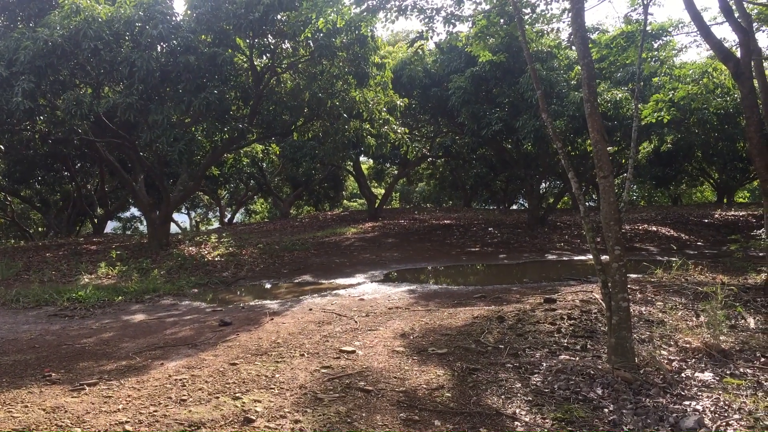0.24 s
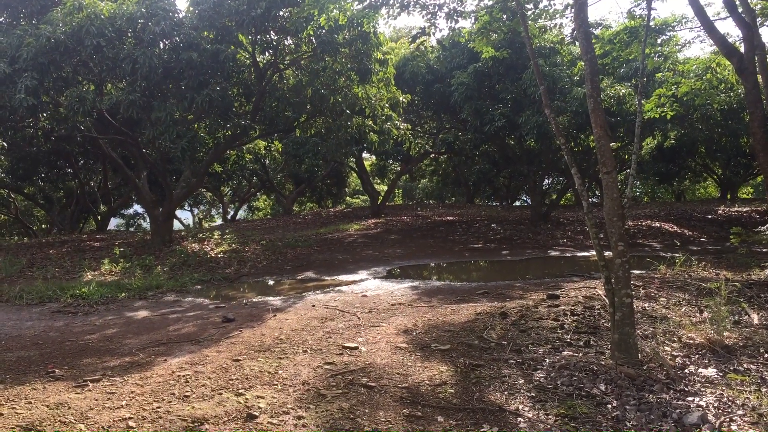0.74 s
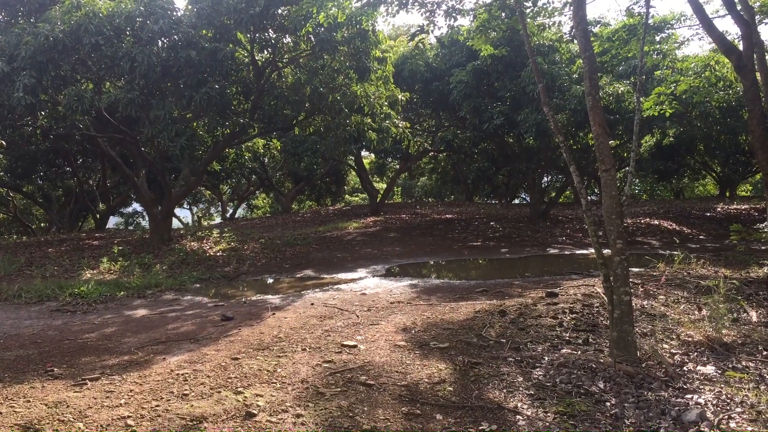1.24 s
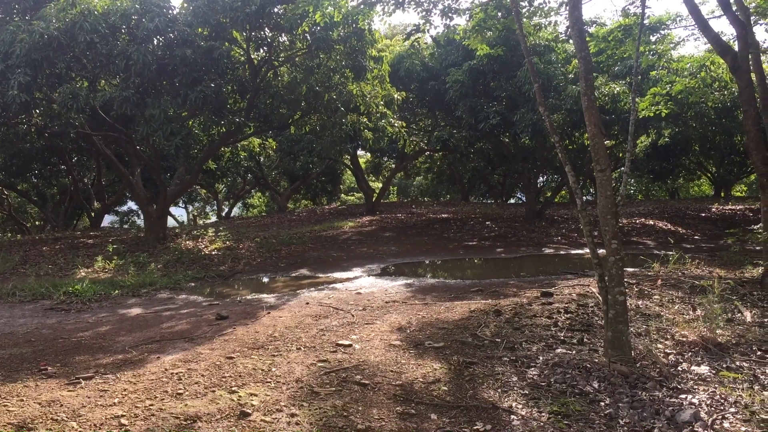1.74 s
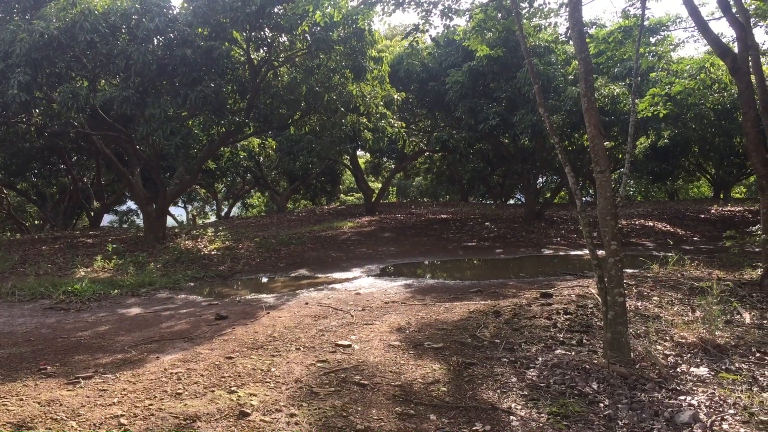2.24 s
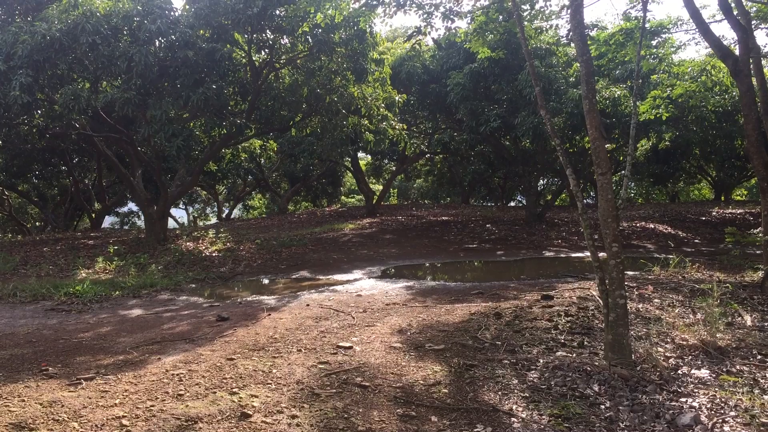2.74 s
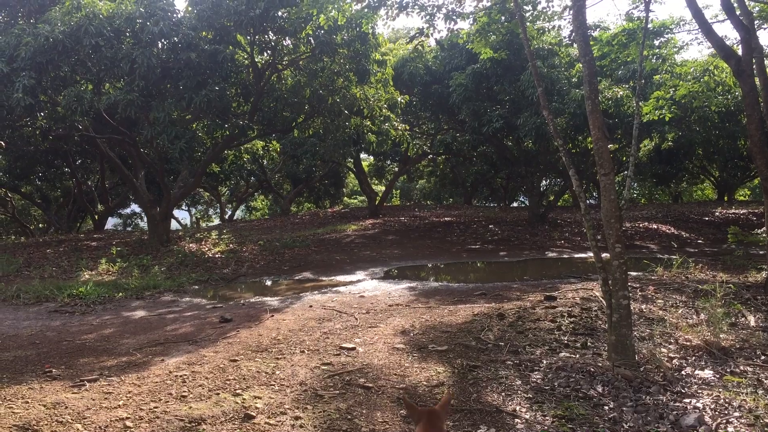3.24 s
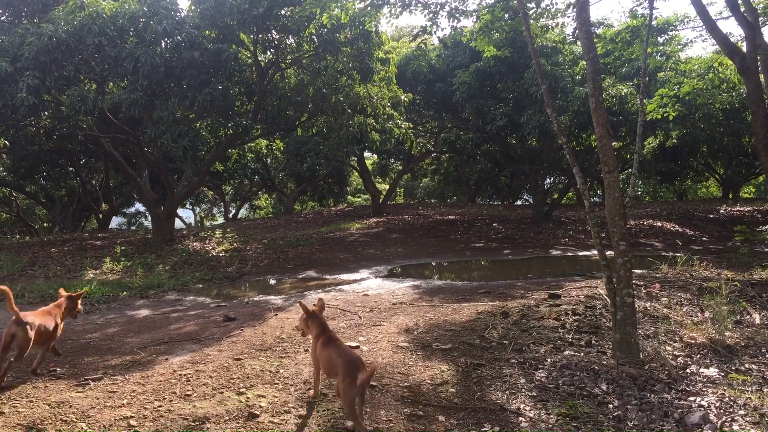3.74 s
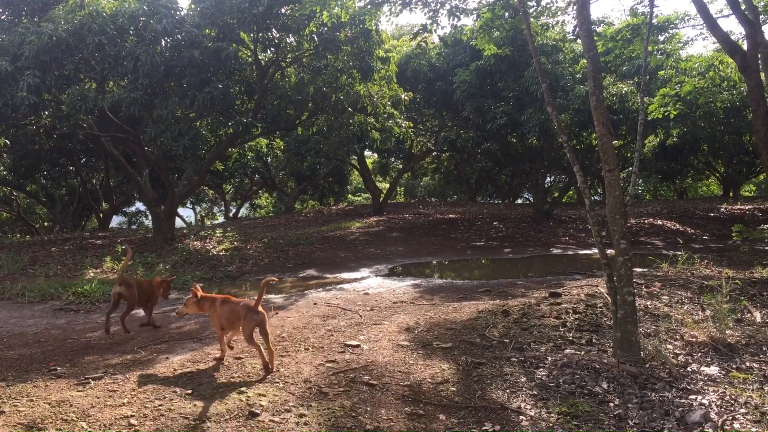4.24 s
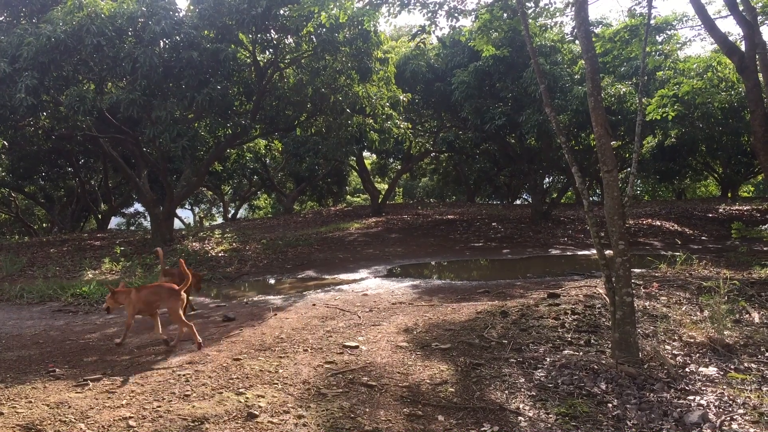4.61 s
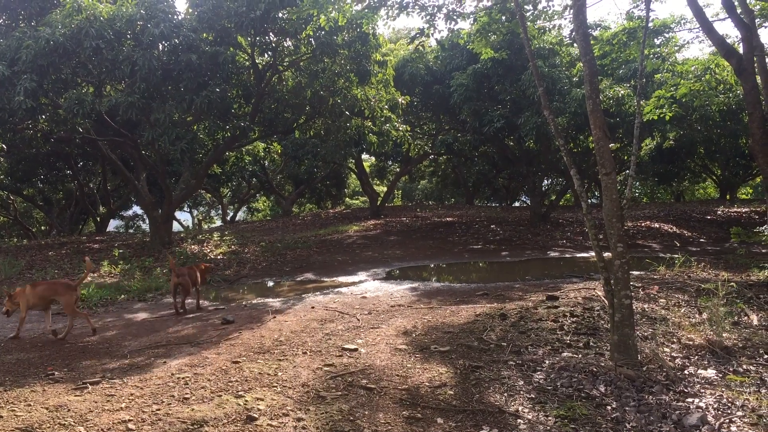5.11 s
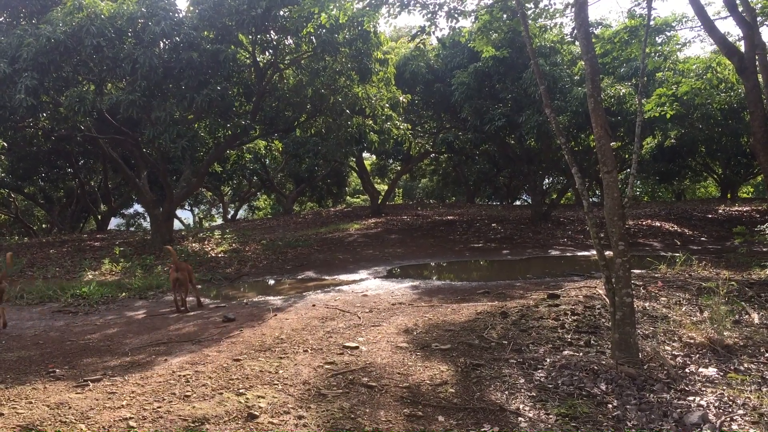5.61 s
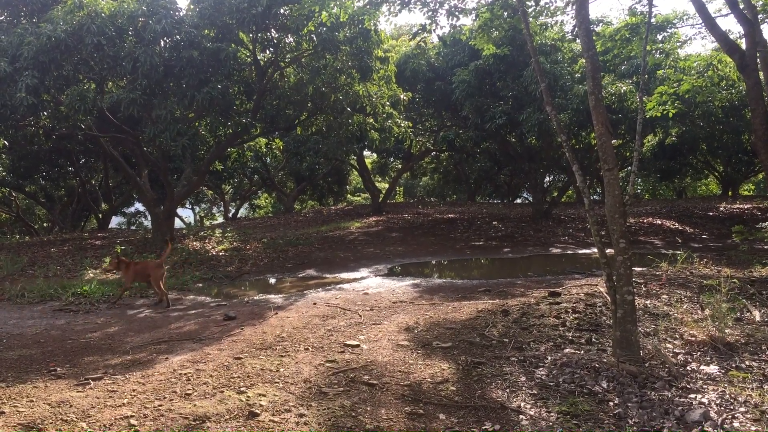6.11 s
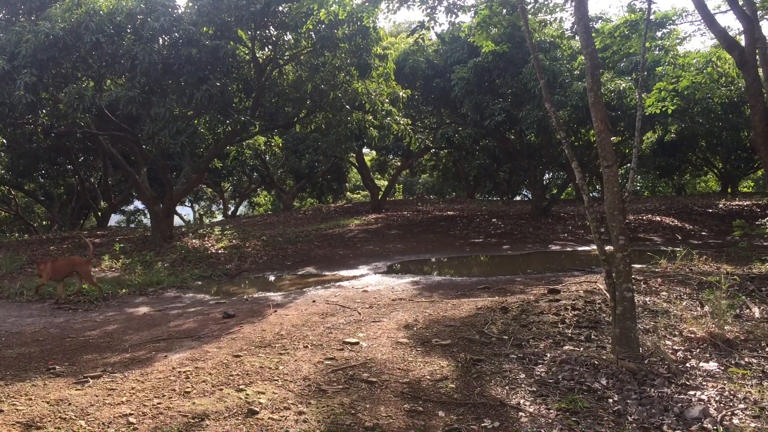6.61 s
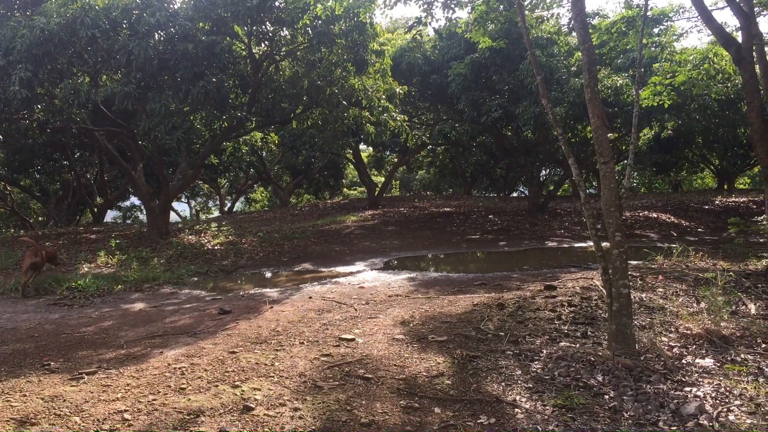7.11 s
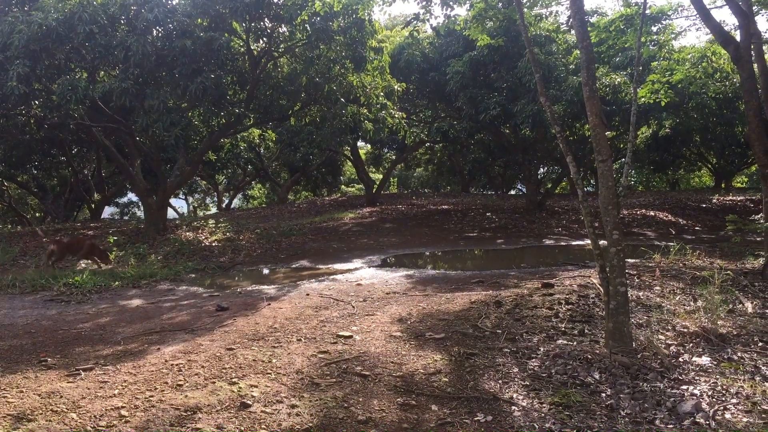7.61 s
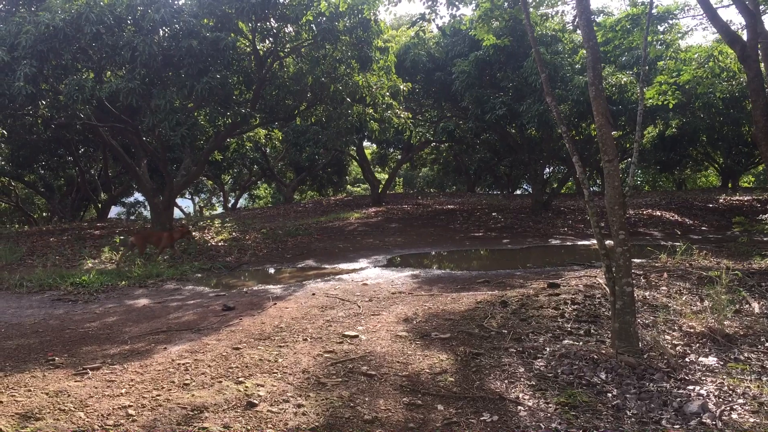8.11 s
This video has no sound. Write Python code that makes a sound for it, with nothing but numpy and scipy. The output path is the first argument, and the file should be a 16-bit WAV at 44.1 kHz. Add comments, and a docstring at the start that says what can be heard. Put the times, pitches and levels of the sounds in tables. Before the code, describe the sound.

A dense, shrill cicada chorus pulses steadily in a sunny orchard while wind bumps the microphone, dog paws scuff soil and a far dove coos.

```python
"""A cicada chorus in a sunny orchard, heard by one microphone, over a faint rustle of the grove.
From the start several kinds of singers, trains of clicks and hiss, hold their own bands; a near one buzzes in
phrases with short pauses. Light wind buffets the microphone as lumps of low noise. From about 2 s two dogs
trot past, scuffing the soil with ringing bursts of grit; after 3 s a far dove coos twice in near-sine notes.
Near 5 s and 7 s a small insect chirps faintly in buzzy tones."""
import sys
import numpy as np
from scipy import signal
from scipy.fft import rfft, irfft, next_fast_len
from scipy.io import wavfile
from scipy.ndimage import uniform_filter1d

SR = 44100
rng = np.random.default_rng(int(sys.argv[2]) if len(sys.argv) > 2 else 0)


def to_wav(sig):
    """Store sig (one row per channel, or 1-D mono) as 16-bit WAV at the path in sys.argv[1].

    Samples outside -1..1 are clipped; the rate is SR.
    """
    pcm = np.clip(np.atleast_2d(sig), -1, 1) * 32767
    pcm = np.round(pcm).astype(np.int16)
    wavfile.write(sys.argv[1], SR, pcm.T)  # frames by channels


N = 368235

# Spectrum of the grove's far rustle. Each row: frequency in Hz, relative density in dB per Hz.
RUSTLE_SPECTRUM = [(88, -35), (150, -1), (374, -4), (439, -7), (871, -8), (2080, -8), (2300, -13.5),
                   (2990, -42), (5060, -120)]
RUSTLE_DB = -72

# Spectra of large and small wind eddies. Each row: frequency in Hz, relative density in dB per Hz.
LARGE_EDDY_SPECTRUM = [(20, -6), (35, -4.5), (60, 4.5), (90, -2.5), (120, -10), (170, -29.5)]
SMALL_EDDY_SPECTRUM = [(70, -20), (105, -0.5), (150, -4.5), (206, -11.5), (264, -17.5), (350, -27),
                       (420, -38), (600, -78)]
# Breeze under the knocks. Each row: time in seconds, level in dB ahead of the chance swell and the port.
BREEZE = [(0.0, -42), (0.18, -69), (0.58, -57), (0.91, -64.5), (1.44, -55.5), (2.14, -70), (5.0, -60.5),
          (5.25, -66), (6.05, -63.5), (7.49, -67.5), (7.7, -75.5), (8.35, -66.5)]
BREEZE_SWELL_DB, BREEZE_UPPER_DB = 4.0, -15   # spread of the chance swell; small eddies relative to large
# Single knocks of wind on the microphone. Each row: time of the peak in seconds, peak level in dB ahead of
# the port, level of the upper part relative to that in dB, width at half height in seconds.
KNOCKS = [(0.0, -39.5, 4, 0.065), (0.108, -48.3, -4.5, 0.048), (0.278, -49.5, -8, 0.018),
          (0.365, -46, -6.5, 0.029), (0.481, -35.3, -3, 0.033), (0.602, -40.3, -7, 0.056),
          (0.675, -47.5, -4, 0.024), (0.757, -49.5, -5.5, 0.042), (0.882, -56.5, -7, 0.066),
          (1.084, -60, 5, 0.038), (1.2, -64, 1, 0.039), (1.269, -40.5, -9.5, 0.025),
          (1.42, -37.5, 6, 0.034), (1.475, -40, -8, 0.029), (1.55, -44, -17, 0.028),
          (1.746, -59, 5.5, 0.045), (1.843, -61, -3, 0.042), (1.966, -53.4, 0.5, 0.04),
          (2.053, -55.8, 0, 0.031), (2.338, -56, -0.5, 0.078), (2.54, -62.5, -9, 0.058),
          (2.659, -46, -8.5, 0.045), (2.938, -58, -20, 0.034), (3.076, -55, -21, 0.047),
          (3.191, -47.5, -15, 0.052), (3.269, -56, 7.5, 0.042), (3.468, -59, -14, 0.032),
          (3.541, -53, -29, 0.035), (3.672, -74, -5, 0.027), (3.769, -51, -9, 0.031),
          (3.842, -58, -15, 0.027), (3.947, -54, -30, 0.033), (4.03, -50, -34, 0.073),
          (4.076, -54.5, -5, 0.027), (4.229, -42, -35, 0.013), (4.297, -54.6, -7.5, 0.06),
          (4.53, -62, -21, 0.026), (4.674, -47, -22, 0.025), (4.825, -54.5, -3.5, 0.072),
          (4.918, -49, -6, 0.047), (4.97, -37.7, -9.5, 0.048), (5.033, -46, -21, 0.035),
          (5.198, -56, -26, 0.018), (5.476, -59, -26, 0.032), (5.716, -55.2, -17.9, 0.031),
          (5.783, -43, -5.9, 0.026), (5.985, -37.5, -12.0, 0.029), (6.122, -46, -11, 0.018),
          (6.22, -44.5, -20, 0.032), (6.297, -59.0, -3, 0.035), (6.394, -48.5, -30, 0.026),
          (6.64, -65, -19, 0.033), (6.867, -59, -8, 0.041), (7.088, -55, -17, 0.07),
          (7.166, -46, -18, 0.045), (7.305, -55, -9, 0.035), (7.416, -62, 5.5, 0.047),
          (7.502, -56, 7, 0.039), (8.238, -57.0, -7, 0.032)]
WAKE_S, WAKE_DB = 0.033, -18.5   # decay time of the wake behind a knock, and its level relative to the knock
KNOCK_UPPER_SHARE = 0.73   # the upper part is this share of the knock's width
PORT_CUT_HZ = 346   # the port muffles the wind above this

# Faint chirps of a small insect. Each row: start in seconds, relative level in dB, pitch in Hz,
# length in seconds.
CHIRPS = [(4.924, -72, 3460, 0.04), (5.292, -75, 3745, 0.032), (6.978, -68, 3440, 0.03),
          (7.062, -76, 3660, 0.033)]
CHIRP_GAIN_DB = 16.5   # added to every chirp's relative level

# Paws scuffing soil. Each row: time in seconds, peak level in dB, ring of the hollow in Hz,
# length of the touch in seconds, level of the broad rasp relative to the ring in dB.
SCUFFS = [(2.145, -52, 1080, 0.03, -4), (2.356, -54, 590, 0.032, -6), (2.387, -42.5, 616, 0.031, 4),
          (2.416, -58, 1162, 0.025, 7), (2.7, -44.5, 1010, 0.026, 1), (2.738, -55, 1030, 0.03, 3),
          (2.901, -58.5, 900, 0.028, -7), (2.934, -59, 1490, 0.018, -11), (2.986, -60, 592, 0.017, -4),
          (3.031, -48.5, 1380, 0.018, 5), (3.07, -51.5, 1100, 0.025, -7), (3.264, -43.5, 1360, 0.045, -5),
          (3.688, -48, 1500, 0.044, -6), (4.243, -62, 1030, 0.028, -6), (5.302, -61, 1810, 0.026, -9),
          (6.883, -59, 860, 0.024, -11)]

# The dove's two coos, a list of rows for each. Each row: time in seconds, pitch in Hz, level in dB,
# depth of the throat roll from 0 to 1.
COOS = [
    [(3.305, 627, -66, .1), (3.336, 728, -64, 0.3), (3.366, 724, -60, 0), (3.39, 630, -64, 0),
     (3.41, 640, -75, .1)],
    [(3.63, 634, -69, 0.74), (3.72, 651, -67, 0.7), (3.80, 637, -63.5, 0.5), (3.87, 643, -67, 0.4),
     (3.92, 595, -65.5, 0.4), (3.96, 623, -72, 0.6), (3.975, 613, -86, 0.26), (3.995, 602, -68, 0.4),
     (4.05, 569, -78, 0.6), (4.10, 517, -77, .5)],
]
ROLL_HZ = 46.0

# Starts of the low singer's phrases, in seconds.
DRUM_STARTS = [.13, .5, .8, 1.02, 1.3, 1.621, 2.049, 2.5, 2.95, 3.2, 3.421, 3.85, 4.15, 4.43, 4.67, 4.85,
               5.182, 5.65, 5.95, 6.15, 6.4, 6.65, 6.86, 7.15, 7.35, 7.7, 7.901]
DRUM_HZ, DRUM_SLIDE_HZ = 3055, 70   # middle of the note; how far it slides up through each phrase
DRUM_WANDER = 0.00202   # slow pitch wander, as a share of the note
DRUM_DB, DRUM_FLICKER_DB = -58.5, 3   # level and spread of its slower flicker

# Song spectra, one table for each band of singers.
# Each row: frequency in Hz, relative density in dB per Hz.
THROB_HIGH_SPECTRUM = [(4030, -60), (6850, -34), (7400, -16), (7830, -5), (8660, 3.5), (9200, 1),
                       (9920, -28), (10200, -13), (13300, -58), (22000, -120)]
THROB_LOW_SPECTRUM = [(2910, -39), (4950, -5.5), (5250, 1), (5930, 7.5), (6220, 1.5), (6510, -25.5),
                      (6640, -34), (6850, -22.5), (8900, -58), (15100, -120)]
SHRILL_SPECTRUM = [(6000, -53), (10200, -27.5), (10500, -23), (10900, -1), (11600, 6.5), (12300, 7.5),
                   (12800, -38), (16700, -37), (22000, -120)]
MIDDLE_SPECTRUM = [(2210, -79), (3750, -26), (4110, -1), (4330, 5), (4510, 6), (4850, -6), (4950, -15),
                   (6440, -30), (10900, -120)]
LOW_SPECTRUM = [(1240, -47.5), (2100, -23.5), (2530, -10), (2800, -3), (2960, 4), (3030, 2), (3160, 1),
                (3310, -15.5), (3510, -13.5), (3750, -23), (4880, -48), (8250, -120)]
NEAR_SPECTRUM = [(11000, -16), (12700, 1.5), (13000, -20), (13600, 4.5), (14000, -4), (14500, -13.5),
                 (15100, -8.5), (15600, -10), (17000, -40)]

# Slow level shared by the near, throbbing and shrill singers. Each row: time in seconds, level in dB.
CHORUS = [(0, -39.5), (2, -40.5), (3.2, -40), (4.8, -40.5), (6.2, -40.5), (7.4, -42.5), (8.35, -41.5)]
# Blurred low singers behind the chorus: level, and spread of their chance swell.
LOW_DB, LOW_FLICKER_DB = -56, 1.1
# Middle singers between lulls. Each row: time in seconds, level in dB.
MIDDLE = [(0, -52.5), (1.3, -51), (2.4, -49.5), (3.4, -49.5), (4.6, -50.5), (5.6, -53), (7, -52),
          (8.35, -52.5)]
# Lulls of the middle singers. Each row: centre in seconds, depth in dB, width at half depth in seconds.
MIDDLE_LULLS = [(0.1, 4, 0.068), (0.42, 1, 0.049), (0.91, 4, 0.13), (1.15, 6.2, 0.086), (1.39, 11, 0.075),
                (1.63, 5.5, 0.1), (1.89, 6, 0.11), (2.1, 4.5, 0.038), (2.37, 4, 0.1), (2.64, 5.5, 0.12),
                (2.96, 5.5, 0.081), (3.18, 5, 0.087), (3.45, 5.7, 0.092), (3.67, 2, 0.072),
                (3.89, 3, 0.091), (4.14, 3.5, 0.097), (4.38, 6.8, 0.099), (4.67, 8, 0.069),
                (4.94, 5.1, 0.076), (5.23, 7.4, 0.13), (5.44, 4, 0.082), (5.79, 3.5, 0.13), (6.12, 3, 0.13),
                (6.39, 4.3, 0.083), (6.59, 5, 0.083), (6.79, 4, 0.051), (7.03, 2.5, 0.096),
                (7.31, 8.3, 0.054), (7.53, 8, 0.058), (7.8, 5.3, 0.06), (8.02, 2.5, 0.065),
                (8.25, 7, 0.067)]
# Throbbing cicadas between lulls. Each row: time in seconds, upper band in dB and lower band in dB,
# both relative to the chorus.
THROB = [(0, -9, -7), (.8, -8.5, -5.5), (1.3, -8, -4.5), (1.8, -9.5, -6.5), (2.5, -9, -6.5),
         (3.2, -8, -5.5), (3.8, -9, -4), (4.4, -8.5, -7), (5.0, -8.5, -5), (5.6, -8.5, -6), (6.2, -8, -5),
         (6.9, -8, -5), (7.4, -7, -4.5), (7.8, -9.5, -6), (8.35, -12.5, -9)]
# Lulls of the throbbing cicadas. Each row: centre in seconds, depth in dB, width at half depth in seconds.
THROB_LULLS = [(0.05, 7, 0.087), (0.42, 3.5, 0.084), (0.68, 3, 0.12), (0.91, 6.5, 0.073),
               (1.19, 6.5, 0.078), (1.45, 8, 0.066), (2.03, 6.5, 0.064), (2.15, 3, 0.06),
               (2.37, 5.5, 0.084), (2.65, 5, 0.093), (2.97, 8, 0.079), (3.15, 2.5, 0.051),
               (3.36, 4.5, 0.074), (3.59, 3.5, 0.11), (3.87, 6, 0.1), (4.14, 8, 0.091), (4.35, 3.0, 0.045),
               (4.76, 3.5, 0.043), (5.1, 4, 0.19), (5.26, 1.5, 0.073), (5.45, 3, 0.032), (5.77, 3, 0.16),
               (6.0, 3.5, 0.12), (6.3, 6.5, 0.065), (6.57, 8.5, 0.098), (6.79, 8, 0.065),
               (6.98, 4.0, 0.061), (7.13, 4.5, 0.12), (7.51, 5.5, 0.121), (7.82, 5.5, 0.089),
               (8.04, 9, 0.072)]
LOW_LULL_SHARE = 1   # the lower band dips by this share of each lull
# Shrill singers: level relative to the chorus, and spread of their chance swell.
SHRILL_DB, SHRILL_FLICKER_DB = -3.5, 0.6
# The shrill band flares as each near phrase ends, then dips a little in the pause;
# both are shares of the pause's depth.
FLARE_SHARE, FLARE_DIP_SHARE = 0.43, 0.21
FLARE_LEAD_S, FLARE_S = 0.057, 0.061   # lead before the pause; width at half height
# Pauses between the near cicada's phrases. Each row: centre in seconds, depth in dB,
# width at half depth in seconds.
NEAR_PAUSES = [(0.058, 5, 0.042), (0.303, 4.2, 0.098), (0.605, 4, 0.081), (0.892, 4, 0.131),
               (1.202, 6.7, 0.05), (1.448, 3, 0.058), (1.77, 3, 0.061), (2.023, 1, 0.067),
               (2.377, 7, 0.057), (2.62, 4, 0.081), (2.938, 1, 0.061), (3.18, 4, 0.074), (3.512, 4, 0.084),
               (3.747, 1, 0.136), (4.092, 3, 0.074), (4.362, 6.7, 0.056), (4.74, 3, 0.076),
               (5.0, 8.0, 0.078), (5.362, 7, 0.042), (5.644, 5.5, 0.07), (5.966, 4, 0.042), (6.19, 0, 0.11),
               (6.543, 4, 0.074), (6.81, 7, 0.053), (7.144, 6, 0.044), (7.394, -1, 0.073), (7.77, 6, 0.043),
               (8.04, 11.1, 0.047)]
NEAR_DB, NEAR_CLIMB_DB = -6.5, 3.5   # level relative to the chorus; swell through each phrase

MIC_LOW_HZ, CUTOFF_HZ = 42.4, 15730   # bass and treble limits of the microphone


def from_db(db):
    """dB to gain."""
    return 10 ** (np.asarray(db) / 20)


def rms_one(x):
    """Scale to rms 1."""
    return x / np.sqrt(np.mean(x ** 2) + 1e-20)


def in_time(rows):
    """Draw each column as a curve in time, one value a sample."""
    s, *columns = np.transpose(rows)
    return [np.interp(np.arange(N) / SR, s, column) for column in columns]


def colour(x, spectrum):
    """Shape a flat signal to this spectrum, silent outside it; rms 1."""
    size = next_fast_len(N)
    hz, db = np.transpose(spectrum)
    log_bins = np.log(np.arange(1, size // 2 + 2) * SR / size)
    gain = from_db(np.interp(log_bins, np.log(hz), db, left=-200, right=-200))
    return rms_one(irfft(rfft(x, size) * gain, size)[:N])


def resonate(x, hz, width_hz):
    """Ring one resonance, with gain close to 1 at its peak."""
    r = np.exp(-np.pi * width_hz / SR)
    feedback = [1, -2 * r * np.cos(2 * np.pi * hz / SR), r * r]
    return signal.lfilter([(1 - r * r) / 2, 0, (r * r - 1) / 2], feedback, x)


def drift(rate_hz):
    """Slow chance: noise twice through a one-pole low-pass at this rate; spread 1."""
    step = 40   # samples between slow values
    r = np.exp(-2 * np.pi * rate_hz * step / SR)
    noise = rng.standard_normal(N // step + 2002)
    slow = signal.lfilter([1], [1, -2 * r, r * r], noise)[2000:]   # skip the filter's settling
    return np.interp(np.arange(N) / step, np.arange(len(slow)), rms_one(slow))


def hump(s, length):
    """A bell-shaped hump centred at s seconds, this long at half its height."""
    from_centre = np.arange(N) / SR - s
    return np.exp(-np.log(2) * (2 * from_centre / max(length, .005)) ** 2)


def lulls(rows):
    """Level in dB that sinks smoothly at each lull."""
    return -sum(depth_db * hump(s, length) for s, depth_db, length in rows)


def progress(starts):
    """How far each phrase has got, from -.5 to .5, with the resets smoothed."""
    phrases = np.arange(len(starts) + 1)
    done = np.interp(np.arange(N) / SR, np.append(starts, N / SR), phrases) % 1
    return uniform_filter1d(done - .5, size=SR // 30)


def evened(x, window_s, floor):
    """Flatten the chance swell of a noise by dividing by its short-time level; rms 1."""
    power = uniform_filter1d(x ** 2, max(int(window_s * SR), 9))
    return rms_one(x / np.sqrt(power + abs(floor)))


def rustle():
    """The far grove's rustle: coloured noise with a slight chance swell."""
    level = from_db(RUSTLE_DB + 1.3 * drift(15.0))
    return level * colour(rng.standard_normal(N), RUSTLE_SPECTRUM)


def wind():
    """Eddies hit the port as short lumps; small ones flutter faster and reach higher."""
    t = np.arange(N) / SR
    breeze_db, = in_time(BREEZE)
    lower = from_db(breeze_db + BREEZE_SWELL_DB * drift(10.8))
    upper = lower * from_db(BREEZE_UPPER_DB + 4.8 * drift(31.3))
    for s, db, upper_db, length in KNOCKS:
        wake = from_db(WAKE_DB) * np.exp(-np.abs(t - s) / WAKE_S) * (t > s)
        lower = lower + from_db(db) * np.maximum(hump(s, length), wake)
        upper = upper + from_db(db + upper_db) * hump(s, KNOCK_UPPER_SHARE * length)
    large = evened(colour(rng.standard_normal(N), LARGE_EDDY_SPECTRUM), window_s=.035, floor=0.057)
    small = evened(colour(rng.standard_normal(N), SMALL_EDDY_SPECTRUM), window_s=0.0233, floor=0.046)
    port = signal.butter(2, PORT_CUT_HZ, fs=SR, output="sos")
    return signal.sosfilt(port, lower * large + upper * small)


def chirps():
    """Short buzzy notes: the pulse rate, as phase modulation, splits each chiefly into three tones."""
    out, t = np.zeros(N), np.arange(SR // 10) / SR
    for s, db, hz, length in CHIRPS:
        swell = np.sin(np.pi * np.clip(t / length, 0, 1))
        pulses = 0.3 * np.sin(2 * np.pi * 205.0 * t)
        roughness = rng.normal(0, 0.033, len(t)).cumsum()   # random walk of the phase
        note = np.sin(2 * np.pi * hz * t + pulses + roughness)
        i = round(s * SR)
        out[i:i + len(t)] += from_db(db + CHIRP_GAIN_DB) * swell * note
    return out


def scuffs():
    """A few uneven grit clicks that also set a hollow under the paw ringing."""
    out, t = np.zeros(N), np.arange(SR // 5) / SR
    grit = rng.standard_normal((len(SCUFFS), len(t))) ** 5   # the power leaves a few strong clicks
    clods_hz = 500 * from_db(rng.uniform(0, 14.9, (len(SCUFFS), 5)))   # loose clods ring at chance pitches
    for (s, db, hz, length, rasp_db), noise, clods in zip(SCUFFS, grit, clods_hz):
        touch = noise * np.sin(np.pi * np.clip(t / max(length, .004), 0, 1)) ** 0.077
        hollow = resonate(resonate(touch, hz, 160.0), hz, 160.0)
        rasp = sum(resonate(touch, clod_hz, 210.0) * (-1) ** k for k, clod_hz in enumerate(np.sort(clods)))
        sound = rms_one(hollow) + from_db(rasp_db) * rms_one(rasp)
        i = round((s - .005) * SR)   # the touch begins 5 ms ahead of the listed time
        out[i:i + len(t)] += from_db(db) * sound / np.max(np.abs(sound))
    return out


def dove():
    """A soft near-sine coo; the throat flutters and rolls its level."""
    out, t = np.zeros(N), np.arange(N) / SR
    flutter = np.cos(2 * np.pi * np.cumsum(ROLL_HZ * (1 + 0.047 * drift(15))) / SR)
    for rows in COOS:
        hz, db, roll = in_time(rows)
        fades = np.clip(np.minimum(t - rows[0][0], rows[-1][0] - t) / 0.01, 0, 1)
        phase = 2 * np.pi * np.cumsum(hz * (1 + 0.01614 * drift(44))) / SR
        throat = 1 + np.clip(roll, 0, 1) * flutter
        out += np.sqrt(2) * from_db(db) * throat * fades * np.sin(phase)
    return out


def grove(x):
    """Trunks and ground scatter a short, faint tail behind each sound."""
    t = np.arange(SR // 4) / SR
    tail = rng.standard_normal(len(t)) * from_db(-60 * t / 0.2) * (t > .008)   # falls 60 dB in 0.2 s
    tail = tail / np.sqrt(np.sum(tail ** 2))
    return x + from_db(-10.5) * signal.oaconvolve(x, tail)[:N]


def low_singer():
    """A ringing drum note that keeps breaking up; the stroke rate adds a side tone above it."""
    wander = DRUM_WANDER * drift(4.0) + 0.00594 * drift(30.1)
    note_hz = (DRUM_HZ + DRUM_SLIDE_HZ * progress(DRUM_STARTS)) * (1 + wander)
    phase = 2 * np.pi * np.cumsum(note_hz) / SR
    strokes = 2 * np.pi * np.cumsum(250.0 * (1 + 0.0099 * drift(3.97))) / SR
    side = from_db(-12.0 + 3.3 * drift(10)) * np.sin(phase + strokes)
    level = from_db(DRUM_DB + DRUM_FLICKER_DB * drift(7.7) + 2.83 * drift(21.7))
    return level * np.sqrt(2) * (np.sin(phase) + side)


def singers(pulse_hz, spread, waver, echo_s, blur, count):
    """Even click trains give tonal strands; leaf echoes smear and colour them, the far crowd melts into hiss."""
    out, t = 0, np.arange(SR // 20) / SR
    for _ in range(count):
        pace = 1 + spread * rng.normal() + waver * (1.6 * drift(14) + 3.0 * drift(.5))
        turns = np.cumsum(pulse_hz * pace) / SR
        clicks = np.diff(np.floor(turns + rng.random()), prepend=0)   # one click each whole turn
        echoes = rng.standard_normal(len(t)) * np.exp(-t / max(echo_s, 1e-4))
        strands = rms_one(signal.oaconvolve(clicks, echoes)[:N])
        branches = np.append(4.0, echoes[:32])   # nearby branches tint the hiss
        crowd = rms_one(signal.lfilter(branches, [1], rng.standard_normal(N)))
        out = out + (strands + blur * crowd) * from_db(3.96 * drift(4.6))
    # Even the sum: one singer swells as another fades.
    return out / np.sqrt(uniform_filter1d(out ** 2, size=SR // 12) + 1e-9)


def flares():
    """Level in dB: a brief rise before each of the near pauses, a slight dip in it."""
    rise = sum(depth_db * hump(s - FLARE_LEAD_S, FLARE_S) for s, depth_db, _ in NEAR_PAUSES)
    return FLARE_SHARE * rise + FLARE_DIP_SHARE * lulls(NEAR_PAUSES)


def near_phrases():
    """Level in dB: every phrase climbs steadily, then breaks off."""
    return NEAR_CLIMB_DB * progress(np.transpose(NEAR_PAUSES)[0]) + lulls(NEAR_PAUSES)


def buzz(pulse_hz, waver, sharp):
    """One near singer: each buckling of the tymbal is a noise burst of rib clicks."""
    phase = 2 * np.pi * np.cumsum(pulse_hz * (1 + waver * drift(3))) / SR
    return rms_one(np.exp(sharp * np.cos(phase)) * rng.standard_normal(N))


def cicadas():
    """Tymbal pulse trains and hiss, shaped by body spectra and phrased band by band."""
    chorus_db, = in_time(CHORUS)
    middle_db, = in_time(MIDDLE)
    high_db, low_db = in_time(THROB)
    lull_db = lulls(THROB_LULLS)
    slow = singers(223.0, spread=.03, waver=.004, echo_s=0.0083, blur=2.17, count=3)
    shrill = singers(222.0, spread=.02, waver=0.0018, echo_s=0.0086, blur=1.0, count=3)
    fast = singers(303.0, spread=.012, waver=.003, echo_s=0.003, blur=0.96, count=3)

    blurred = (slow + 1.38 * rng.standard_normal(N)) * from_db(LOW_FLICKER_DB * drift(7.3))
    low = from_db(LOW_DB) * colour(blurred, LOW_SPECTRUM)
    middle = from_db(middle_db + lulls(MIDDLE_LULLS)) * colour(slow, MIDDLE_SPECTRUM)
    throb_high = from_db(high_db + lull_db) * colour(fast, THROB_HIGH_SPECTRUM)
    throb_low = from_db(low_db + LOW_LULL_SHARE * lull_db) * colour(fast, THROB_LOW_SPECTRUM)
    far_db = SHRILL_DB + flares() + SHRILL_FLICKER_DB * drift(8.3)
    far = from_db(far_db) * colour(shrill, SHRILL_SPECTRUM)
    near_song = buzz(222.5, waver=0.0055, sharp=1.9) + 0.83 * shrill
    near = from_db(NEAR_DB + near_phrases()) * colour(near_song, NEAR_SPECTRUM)
    return low + middle + from_db(chorus_db) * (throb_high + throb_low + far + near)


def scene():
    """All sources reach a single microphone."""
    scattered = grove(chirps() + scuffs() + dove())
    mono = rustle() + wind() + scattered + low_singer() + cicadas()
    return np.stack([mono, mono])


def record(dry):
    """The microphone drops the deepest bass; the top is cut steeply."""
    bass_cut = signal.butter(2, MIC_LOW_HZ, "high", fs=SR, output="sos")
    thin = signal.sosfilt(bass_cut, dry - dry[:, :1])   # starts from rest, without a click
    top_cut = signal.ellip(14, .5, 80, CUTOFF_HZ, fs=SR, output="sos")
    return signal.sosfilt(top_cut, thin)


dry = scene()
out = record(dry)
to_wav(out)
```